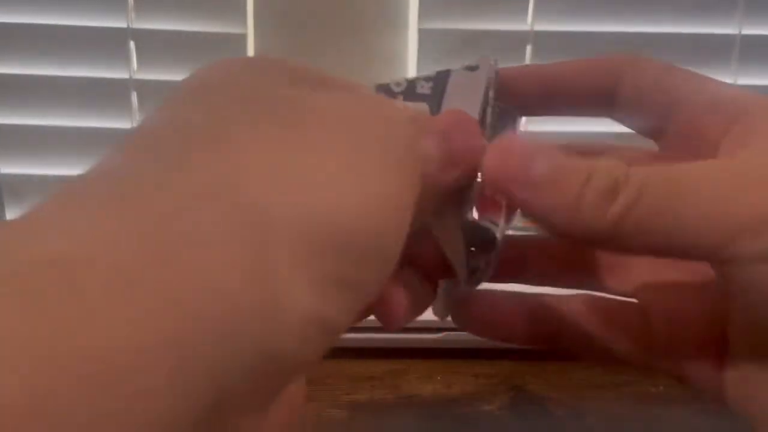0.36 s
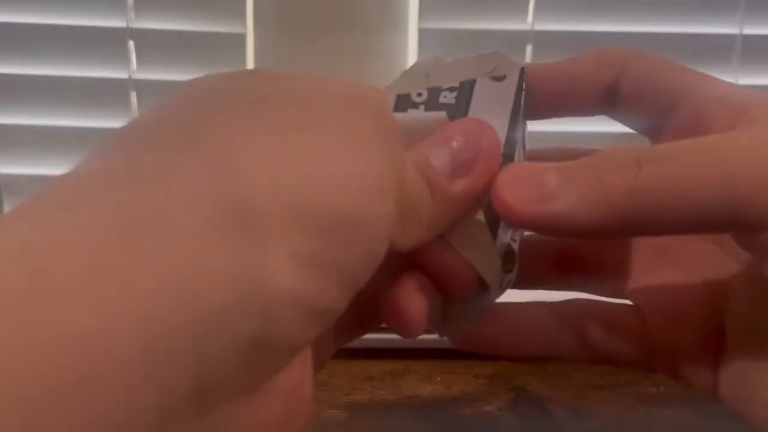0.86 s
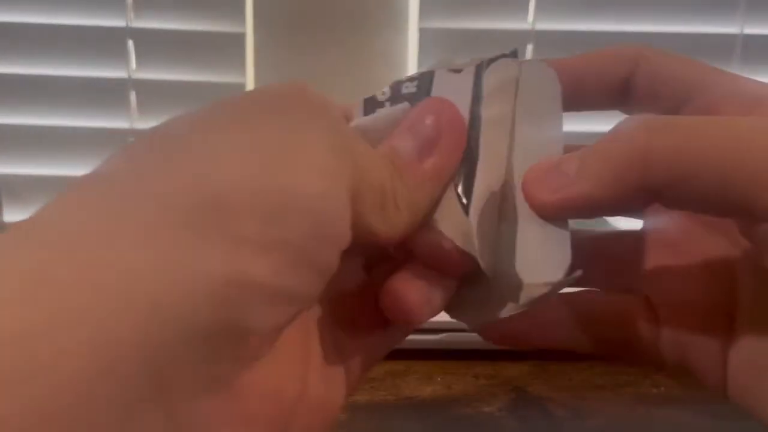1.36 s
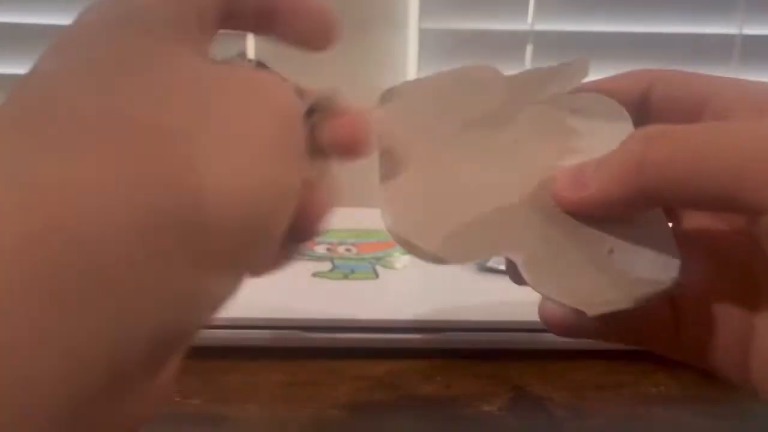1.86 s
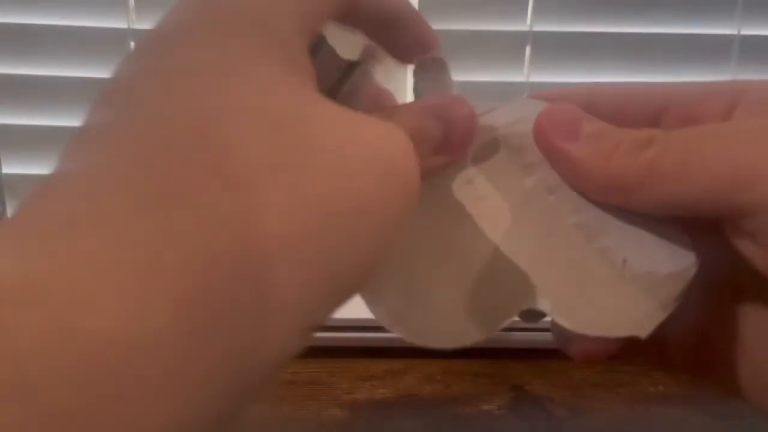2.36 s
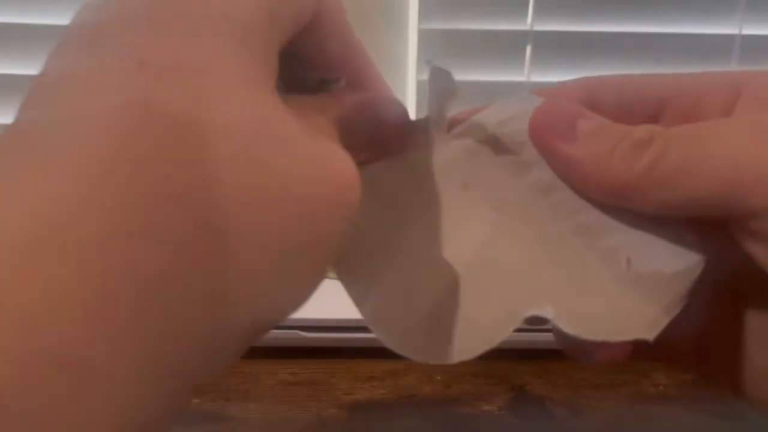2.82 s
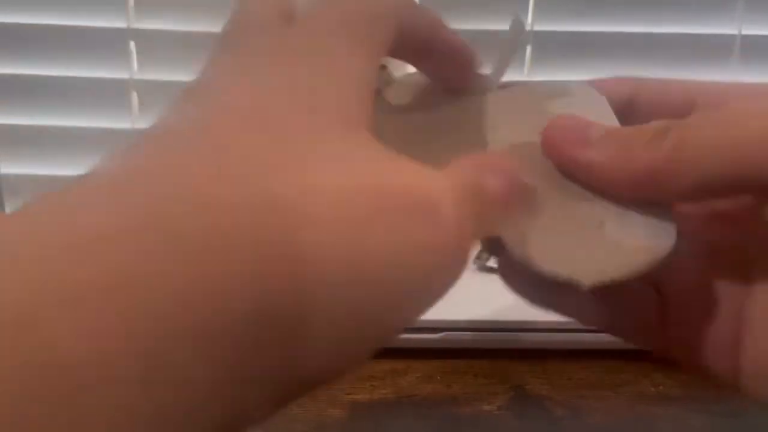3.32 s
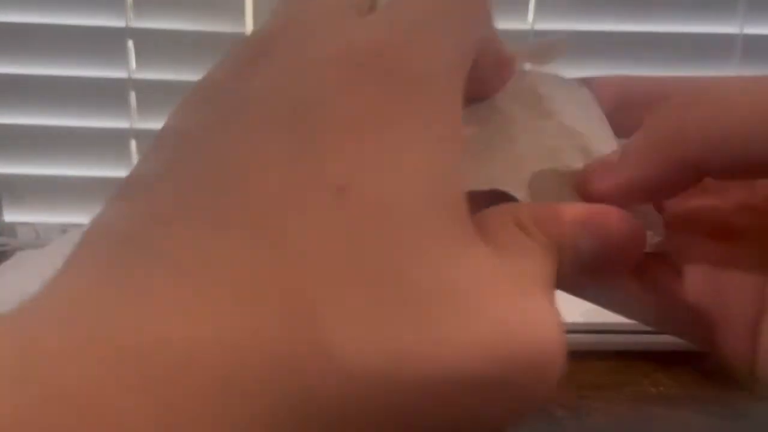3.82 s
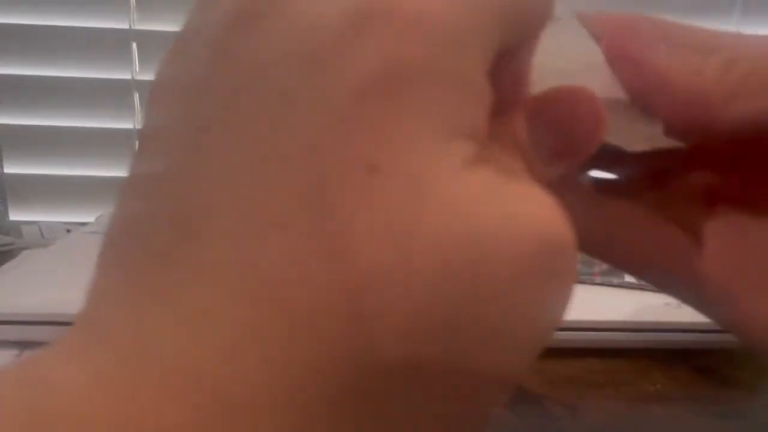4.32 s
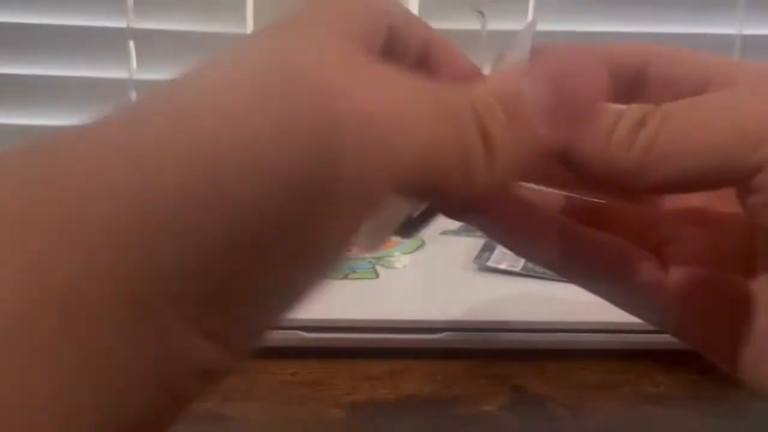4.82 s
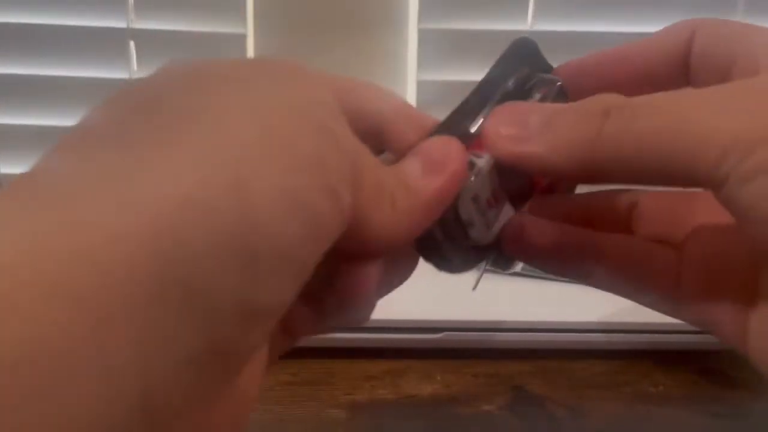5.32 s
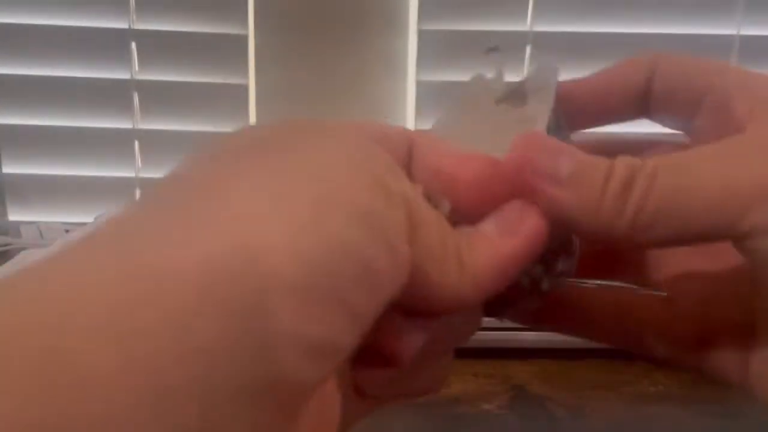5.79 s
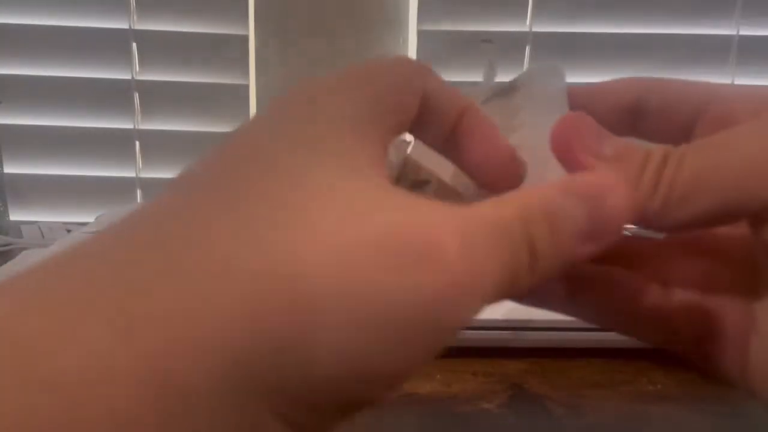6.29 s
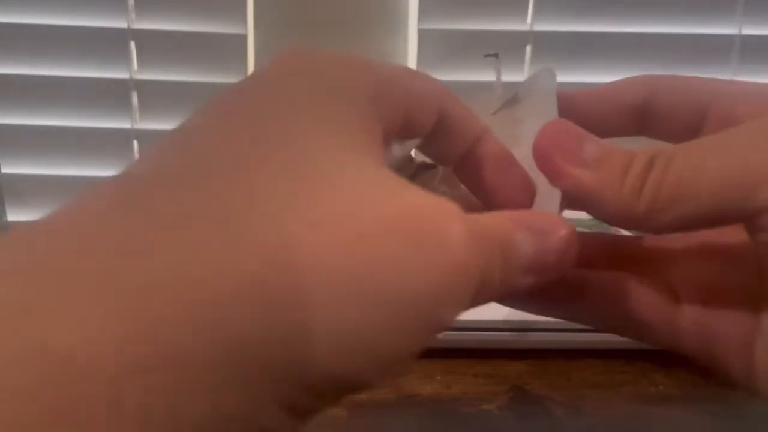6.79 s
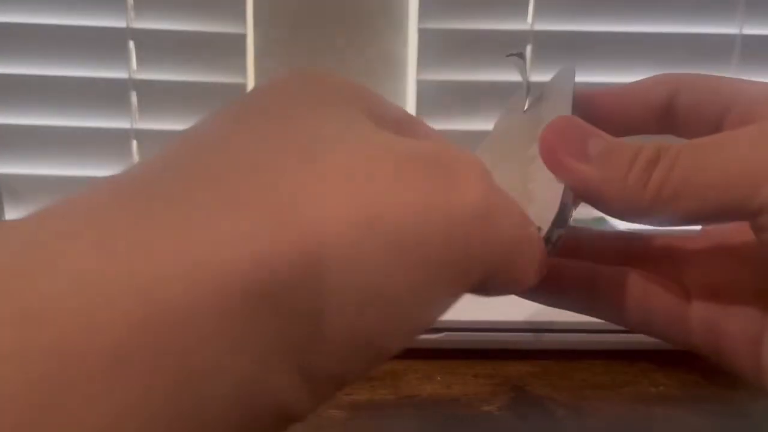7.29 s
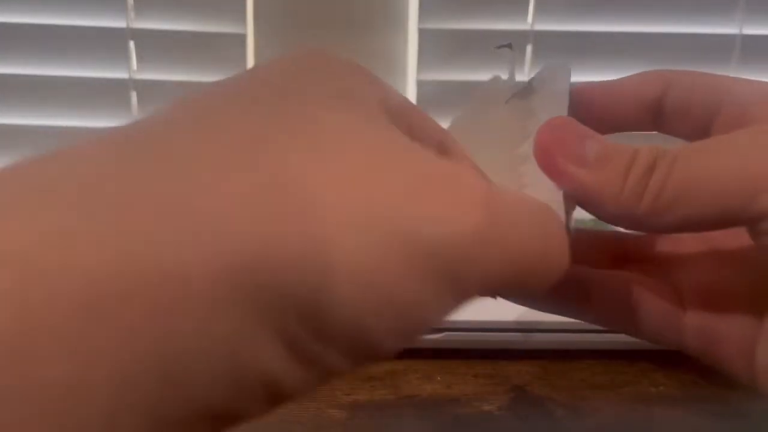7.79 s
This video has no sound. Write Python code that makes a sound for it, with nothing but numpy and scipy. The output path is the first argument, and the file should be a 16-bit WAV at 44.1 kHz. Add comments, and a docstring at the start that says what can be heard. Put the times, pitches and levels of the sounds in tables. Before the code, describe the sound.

Close, dry crackle of stiff card and plastic packaging torn by hand in a quiet room, bursts and snaps thinning to faint ticks.

```python
"""A card-backed plastic pack is pulled apart by fingers, close to a two-port microphone in a small quiet room.
Parting fibres are dense clicks that ring the card; skin and paper rub as a hiss of very fine grains.
Creases and shell snap as single sharp clicks, amid faint smaller ones, through the same card modes, with
a bright crack. The film squeaks thinly through narrow resonances, the handled pack gives low thuds and
short dull ticks from broad resonances, and coloured noise makes the low hum of the room."""
import sys
import numpy as np
from scipy import signal
from scipy.fft import rfft, irfft
from scipy.io import wavfile

SR = 44100
rng = np.random.default_rng(int(sys.argv[2]) if len(sys.argv) > 2 else 0)


def elevation(decibels):
    """Turn decibel levels (scalar or array-like) into linear amplitude ratios."""
    levels = np.asarray(decibels, float)
    return 10 ** (levels / 20)


def bounce(signal):
    """Save signal as a 16-bit WAV file at the path given by the first command-line argument."""
    frames = np.transpose(np.atleast_2d(signal))
    limited = np.clip(frames, -1, 1)
    pcm = np.round(limited * 32767).astype(np.int16)
    wavfile.write(sys.argv[1], SR, pcm)


N = 348390

# pulls, rips and slides of the fingers: [peak t/s, swell/s, fade/s, card tearing level/dB, rubbing hiss level/dB]
FINGER_STROKES = [(0.064, 0.07, 0.025, -40, -47), (0.357, 0.039, 0.033, -57, -53),
                  (.69, 0.057, 0.17, -68, -49), (.95, 0.057, 0.046, -79, -48),
                  (1.039, 0.014, 0.1, -32.5, -31), (1.198, 0.038, 0.026, -41.5, -35),
                  (1.27, 0.054, 0.043, -40, -36.5), (1.414, 0.081, 0.054, -23.5, -25.5),
                  (1.682, 0.07, 0.12, -45.5, -42), (1.773, 0.016, 0.011, -35, -30),
                  (1.899, 0.14, 0.13, -53.5, -43), (2.054, 0.027, 0.0043, -33.5, -43),
                  (2.202, 0.037, 0.026, -44, -39), (2.297, 0.024, 0.059, -48.5, -45.5),
                  (2.474, 0.11, 0.11, -47.5, -42.5), (2.736, 0.17, 0.015, -53, -51.5),
                  (3.199, 0.11, 0.42, -46.5, -41.5), (3.547, 0.029, 0.13, -51, -54),
                  (3.842, 0.12, 0.085, -49, -48), (4.098, 0.018, 0.1, -45.5, -51.5),
                  (4.409, 0.085, 0.16, -43, -49), (4.646, 0.042, 0.14, -37.5, -50),
                  (4.682, 0.013, 0.018, -28, -39), (4.962, 0.01, 0.1, -49, -71),
                  (5.372, 0.06, 0.083, -45, -41), (5.92, 0.026, 0.049, -51.5, -54),
                  (6.04, 0.071, 0.54, -52, -55.5), (6.162, 0.031, 0.026, -72, -47.5),
                  (6.821, 0.018, 0.024, -56.5, -61), (7.061, 0.071, 0.046, -55, -59.5),
                  (7.214, 0.056, 0.1, -65, -63), (7.462, 0.042, 0.11, -61, -59),
                  (7.617, 0.055, 0.11, -56, -60)]
# a stroke gains and loses this much; its ends are smoothed over this share of each side
SWELL_DB, FADE_DB, EDGE = 10.5, 14.5, 0.35
# faint rustle of the held pack between strokes: [t/s, card level/dB, hiss level/dB]
HOLDING_RUSTLE = [(0, -54, -54), (.3, -62.5, -68), (.5, -69.5, -75), (.9, -83, -58.5), (1.3, -48, -39.5),
                  (1.6, -59, -57), (2.9, -62.5, -64.5), (3.7, -64, -66.5), (4.55, -57, -61.5),
                  (4.93, -64, -65.5), (5.05, -70.5, -59), (5.5, -56, -67), (6.55, -72.5, -76.5),
                  (6.75, -66.5, -66.5), (7.35, -85.5, -87), (7.9, -68.5, -68.5)]
# modes that card and shell ring with: [f/Hz, width/Hz, level/dB]
CARD_MODES = [(610, 710, -3.5), (740, 384, 3), (1242, 180, 1), (1414, 286, -1.5), (1850, 200, -2),
              (2220, 422, 1), (2520, 780, -2), (4200, 850, -3.5), (5620, 1000, -12.5), (7420, 230, -9.5)]
# colour of the rubbing hiss: [f/Hz, relative level/dB per Hz]
RUB_COLOUR = [(500, -25.5), (3000, -8), (5500, 1), (8500, 1.5), (13000, 7), (16000, 1.5)]
# colour of the room's hum: [f/Hz, relative level/dB per Hz]
HUM_COLOUR = [(15, -48.5), (59, 2), (87, -12), (123, -10.5), (300, -25), (600, -40), (1500, -63.5)]
# snaps of creases and shell: [t/s, ringing peak level/dB, ringing centre f/Hz, crack rms level/dB over 59 ms]
CREASE_SNAPS = [(0.161, -34.5, 1850, -62), (0.237, -17.5, 2000, -73), (0.262, -40, 1750, -78),
                (1.026, -13.5, 3330, -25), (1.11, -33, 1470, -41), (1.319, -24.5, 4570, -37),
                (1.361, -22.5, 1008, -47), (1.41, -16, 890, -51), (1.454, -25, 1470, -38),
                (1.767, -27, 600, -33.5), (2.046, -21, 690, -50), (2.061, -10, 2070, -51),
                (2.36, -22, 2010, -45), (2.396, -31, 1730, -54), (2.425, -30, 2100, -46),
                (2.489, -29, 1830, -50), (2.535, -34.5, 2110, -51), (2.937, -19.5, 1530, -36.5),
                (3.176, -28, 1190, -53), (4.015, -29.5, 850, -49.5), (4.041, -30.5, 690, -52.5),
                (4.131, -15.5, 1200, -52.5), (4.399, 0, 1310, -22.5), (4.411, -18, 1530, -62),
                (4.424, -14, 1520, -59), (4.626, -29.5, 1210, -58), (4.637, -26.5, 2500, -41),
                (4.672, -15, 1190, -40), (4.955, -19.5, 820, -50.5), (4.963, -19.5, 876, -68),
                (5.274, -11, 3060, -49.5), (5.428, -35, 4200, -52), (5.454, -17, 2040, -67),
                (5.513, -34.5, 1930, -105), (5.54, -35, 2100, -87), (5.566, -29.5, 1460, -90),
                (5.609, -30, 1880, -88), (5.647, -36.5, 1680, -61), (5.673, -32.5, 1700, -60),
                (5.714, -43.5, 1920, -72), (5.746, -25, 1790, -69), (5.998, -39, 830, -69),
                (6.005, -38, 890, -82), (6.472, -31.5, 2370, -70.5), (7.83, -40, 2306, -71.5)]
# low thuds and short dull ticks of the handled pack: [t/s, peak level/dB, centre f/Hz]
PACK_THUDS = [(1.77, -37.5, 64), (2.039, -33.5, 214), (2.329, -40.5, 382), (2.515, -44.5, 275),
              (4.4, -35, 50.3), (4.685, -34, 60.5), (4.949, -39.5, 231), (5.391, -41, 51.5),]
# whistling of a finger sliding on the film: [start t/s, end t/s, centre f/Hz, level/dB before the swell]
FILM_SQUEAKS = [(6.04, 6.34, 6300, -57), (6.24, 6.36, 5100, -58)]
# how far the left channel leads the right: [f/Hz, phase/rad]
LEFT_LEAD = [(300, 0.39), (1200, 0.86), (2000, 1.3), (4400, 1.24), (5800, 2), (7700, -3), (9800, -2.5),
             (12000, -5.5)]


def in_time(rows):
    """Draw each column of a breakpoint table as a curve, one value a sample."""
    s, *columns = np.transpose(rows)
    return [np.interp(np.arange(N) / SR, s, column) for column in columns]


def rms_one(x):
    """Scale to unit rms."""
    return x / np.sqrt(np.mean(x ** 2) + 1e-20)


def colour(x, points):
    """Shape a signal by a spectrum drawn on a log frequency axis."""
    hz, level_db = np.transpose(points)
    bins = np.fft.rfftfreq(N, 1 / SR) + 1
    return irfft(rfft(x) * elevation(np.interp(np.log(bins), np.log(hz), level_db)), N)


def drift(rate_hz):
    """Slow random wander of unit rms: noise through two equal one-pole lowpasses."""
    r = np.exp(-2 * np.pi * rate_hz / SR)
    noise = rng.standard_normal(N + SR)
    wander = signal.lfilter([1], [1, -2 * r, r * r], noise)
    return rms_one(wander[SR:])  # the first second lets the filter settle


def resonance(x, hz, width_hz):
    """Ring a signal through one two-pole mode with a peak gain of 1."""
    r = np.exp(-np.pi * max(width_hz, 20) / SR)
    zeros = [(1 - r * r) / 2, 0, (r * r - 1) / 2]
    poles = [1, -2 * r * np.cos(2 * np.pi * hz / SR), r * r]
    return signal.lfilter(zeros, poles, x)


def grains(per_s, spread_db, clumps_db):
    """Random clicks of either sign and uneven size, swelling into clumps as clumps_db moves."""
    sizes = elevation(spread_db * np.minimum(rng.exponential(1, N), 5))
    signed = sizes * rng.choice([-1, 1], N)
    return signed * (rng.random(N) < per_s / SR) * elevation(clumps_db)


def effort():
    """Levels of tearing and hiss: every stroke swells, fades and stops, over the rustle of holding."""
    power = elevation(2 * np.array(in_time(HOLDING_RUSTLE)))
    t = np.arange(N) / SR
    for s, swell, fade, *level_db in FINGER_STROKES:
        near = slice(max(round((s - swell) * SR), 0), round((s + fade) * SR))
        away = np.maximum((s - t[near]) / swell, (t[near] - s) / fade)  # 0 at the peak, 1 at the ends
        sag_db = np.where(t[near] < s, SWELL_DB, FADE_DB) * away
        edge = np.sin(np.pi / 2 * np.clip((1 - away) / EDGE, 0, 1)) ** 2
        shape = elevation(-sag_db) * edge
        power[:, near] += (elevation(level_db)[:, None] * shape) ** 2
    return np.sqrt(power)


def tearing(level, jerks):
    """Parting fibres ring the card; how strongly each mode answers wanders as the grip shifts."""
    fibres = rms_one(grains(per_s=7200, spread_db=2.0, clumps_db=1.2 * jerks))
    crinkles = rms_one(grains(per_s=700, spread_db=3.0, clumps_db=4 * jerks))
    blows = fibres + elevation(-6) * crinkles
    rings = np.zeros(N)
    for k, (hz, width_hz, mode_db) in enumerate(CARD_MODES):
        answer_db = mode_db + 2.5 * drift(14)
        rings += (-1) ** k * elevation(answer_db) * resonance(blows, hz, width_hz)  # neighbours in opposite sign
    return level * rms_one(rings)


def rubbing(level, jerks):
    """Skin and paper slide in very dense fine grains; the level is that of the band above 10.5 kHz."""
    clumps_db = 0.66 * jerks + drift(51)
    fine = colour(grains(per_s=6900, spread_db=2.5, clumps_db=clumps_db), RUB_COLOUR)
    top = signal.sosfilt(signal.butter(4, 10500, "high", fs=SR, output="sos"), fine)
    return level * fine / np.std(top)


def ports(x):
    """The two channels differ in phase by band; the left one is louder, most in the upper middle."""
    left_db, centre_hz = 4, 2500  # largest difference between the channels, and where it lies
    hz = np.fft.rfftfreq(N, 1 / SR) + 1
    lean = elevation(left_db / 2 / (1 + np.log2(hz / centre_hz) ** 4 / 2))
    lead_hz, lead_rad = np.transpose(LEFT_LEAD)
    lead = np.interp(np.log(hz), np.log(lead_hz), lead_rad)
    return irfft(rfft(x) * [lean, np.exp(-1j * lead) / lean], N)


def room(x):
    """Walls answer with a short dull tail of decaying noise, different at each port."""
    t60_s, wall_cut_hz = 0.17, 8000
    age = np.arange(round(0.4 * SR)) / SR
    tail = rng.standard_normal((2, len(age))) * elevation(-60 * age / t60_s) * (age > 0.002)
    tail = signal.sosfilt(signal.butter(2, wall_cut_hz, fs=SR, output="sos"), tail)
    tail /= np.sqrt((tail ** 2).sum(1).mean())  # unit energy
    return signal.fftconvolve(x[None], tail, axes=1)[:, :N]


def hum(rumble_db, side_db=-15.0):
    """Low rumble of coloured noise, nearly the same at both ports."""
    mid, side = rms_one(colour(rng.standard_normal((2, N)), HUM_COLOUR))
    return elevation(rumble_db) * (mid + elevation(side_db) * side * [[1], [-1]])


def snaps(rise_s=0.0004, creak_s=0.0015, crack_s=0.0015, reach_db=7.0, damping=1.1,
          tail_s=0.004, tail_db=-34.0):
    """A sharp slip amid smaller ones that gather and crumble away rings the modes near its centre most."""
    out = np.zeros(N)
    hz, width_hz, mode_db = np.transpose(CARD_MODES)
    treble = signal.butter(2, 6000, "high", fs=SR, output="sos")
    lead = round(0.006 * SR)  # room for the small slips ahead of the snap
    age = np.arange(round(0.059 * SR)) / SR
    age = age - age[lead]
    rise = 1 - np.exp(-np.maximum(age, 0) / rise_s)
    crumble = elevation(tail_db) * np.exp(np.minimum(age / creak_s, -age / tail_s))
    for s, peak_db, centre_hz, crack_db in CREASE_SNAPS:
        small, hiss = rng.standard_normal((2, len(age)))
        slips = small ** 3 * crumble  # cubing makes the small slips uneven
        slips[lead + 20] += 1  # the one sharp click
        luck_db = rng.normal(0, 2, len(hz))
        near_db = mode_db + luck_db - reach_db * np.log2(hz / centre_hz) ** 2
        body = np.zeros(len(age))
        for k in range(len(hz)):
            ring = resonance(slips, hz[k], damping * width_hz[k])  # gripped card rings short
            body += (-1) ** k * elevation(near_db[k]) * ring
        crack = signal.sosfilt(treble, hiss) * rise * np.exp(-age / crack_s)  # thin edges radiate the treble
        sound = elevation(peak_db) * body / np.abs(body).max() + elevation(crack_db) * rms_one(crack)
        at = round(s * SR) - lead
        out[at:at + len(age)] += sound[:N - at]
    return out


def thuds(rise_s=0.004, cycles=2.0):
    """A soft push of noise rings a broad resonance a few cycles: a thud when low, a short dull tick when higher."""
    out = np.zeros(N)
    age = np.arange(round(0.25 * SR)) / SR
    for s, peak_db, hz in PACK_THUDS:
        noise = rng.standard_normal(len(age))
        push = noise * (1 - np.exp(-age / rise_s)) * np.exp(-age * hz / cycles)
        thud = resonance(resonance(push, hz, 0.97 * hz), hz, 0.97 * hz)
        at = round(s * SR)
        out[at:at + len(age)] += elevation(peak_db) * thud / np.abs(thud).max()
    return out


def squeaks(width_hz=500):
    """Sliding grains pass twice through one resonance, swelling and fading as a thin whistle."""
    out = np.zeros(N)
    t = np.arange(N) / SR
    for start, end, hz, level_db in FILM_SQUEAKS:
        swell = np.sin(np.pi * np.clip((t - start) / (end - start), 0, 1))
        slide = grains(per_s=1700, spread_db=-4.0, clumps_db=0)
        whistle = resonance(resonance(slide, hz, width_hz), hz, width_hz)
        out += elevation(level_db) * swell * rms_one(whistle)
    return out


def scene():
    """Mix the pack at both ports with its room tail, the thuds and ticks, and the hum."""
    card, hiss = effort()
    jerks = drift(45)  # stick and slip of the pull drives both kinds of grain
    pack = tearing(card, jerks) + rubbing(hiss, jerks) + snaps() + squeaks()
    return ports(pack) + elevation(-17.5) * room(pack) + thuds() + hum(rumble_db=-56)


def top_cut(x):
    """Nothing passes above the cut-off."""
    return signal.sosfilt(signal.butter(12, 17010, fs=SR, output="sos"), x)


def record(dry):
    """Narrow the stereo of the highest treble, round the peaks and cut the top."""
    narrow_above_hz, ceiling, stop_hz = 11800, 0.9, 16800
    mid, side = (dry[0] + dry[1]) / 2, (dry[0] - dry[1]) / 2
    lowpass = signal.butter(6, narrow_above_hz, fs=SR, output="sos")
    side = 0.35 * side + 0.65 * signal.sosfiltfilt(lowpass, side)
    stereo = np.array([mid + side, mid - side])
    rounded = ceiling * np.tanh(stereo / ceiling)
    cut = signal.sosfilt(signal.cheby2(12, 80, stop_hz, fs=SR, output="sos"), rounded)
    return top_cut(cut)


dry = scene()
out = record(dry)
bounce(out)
```